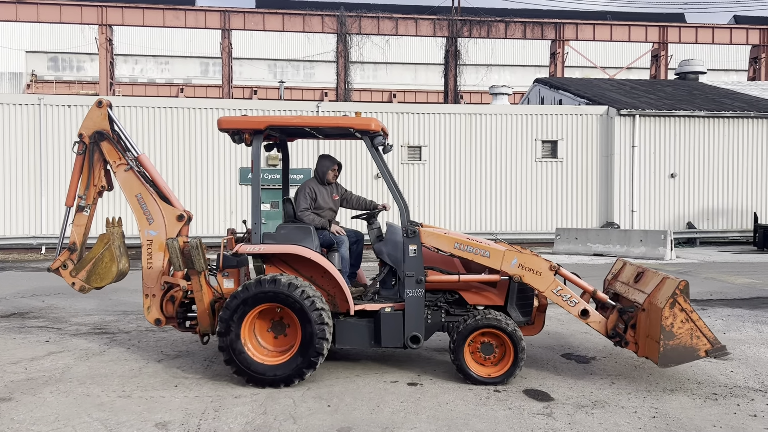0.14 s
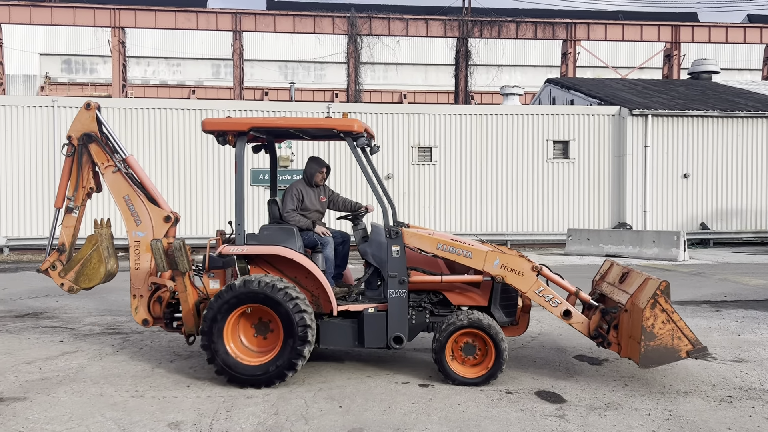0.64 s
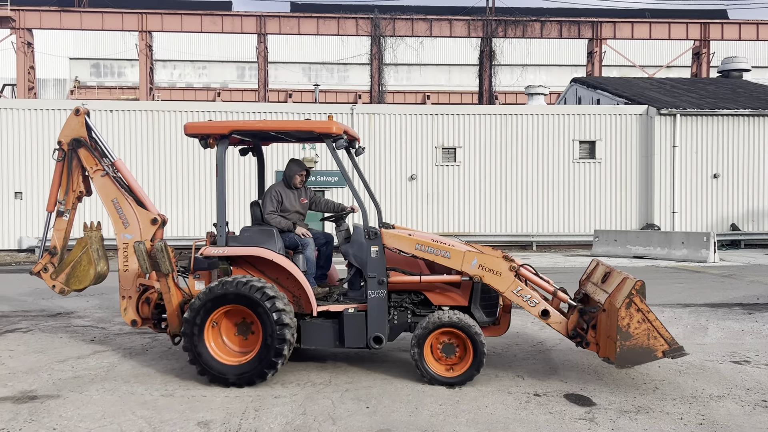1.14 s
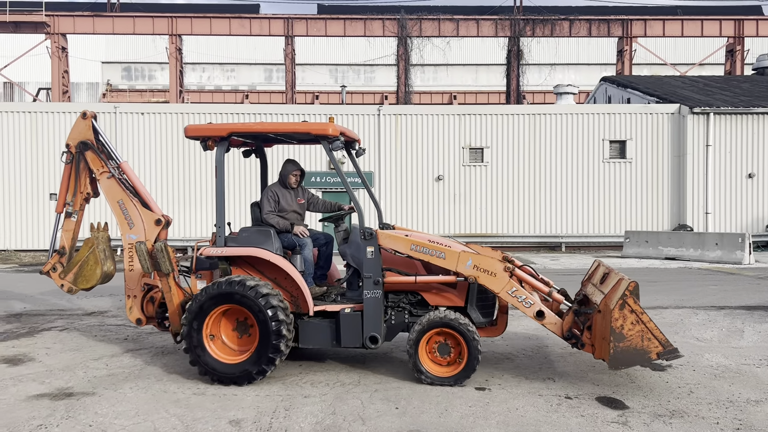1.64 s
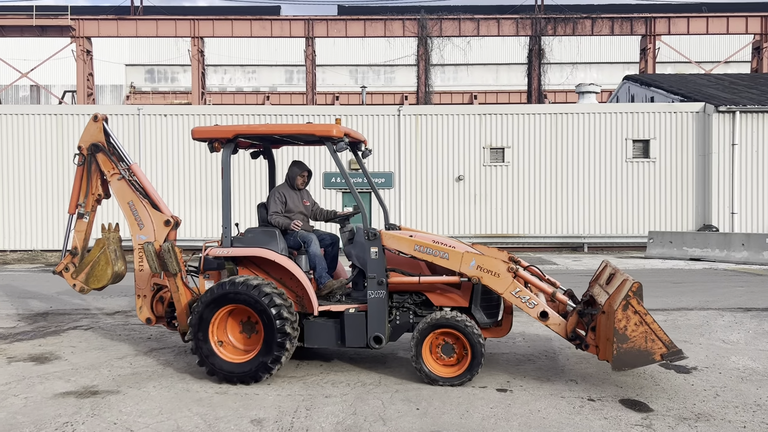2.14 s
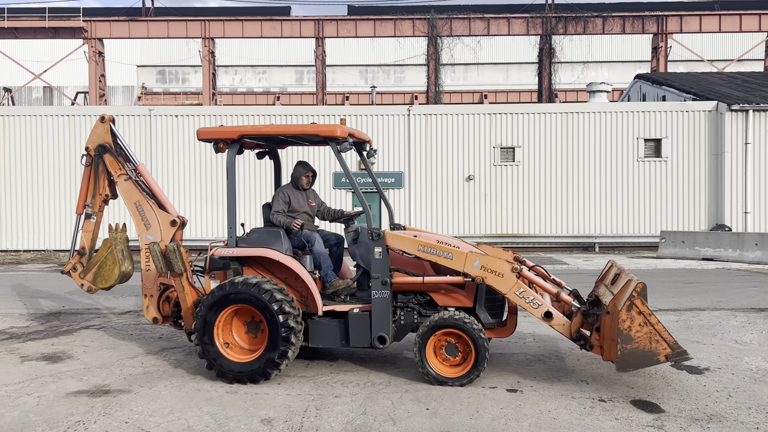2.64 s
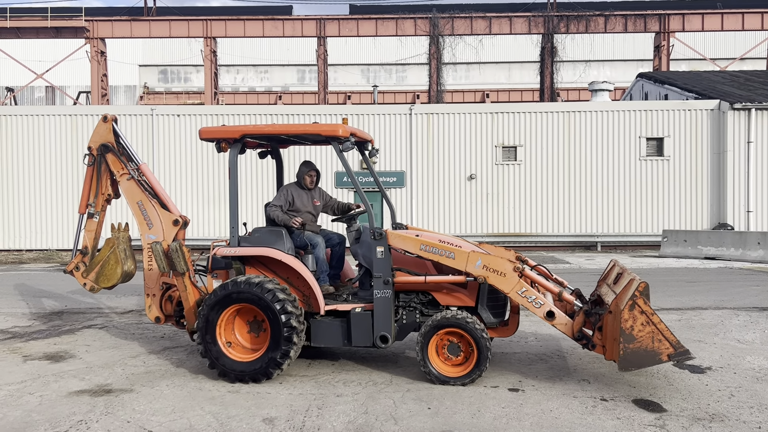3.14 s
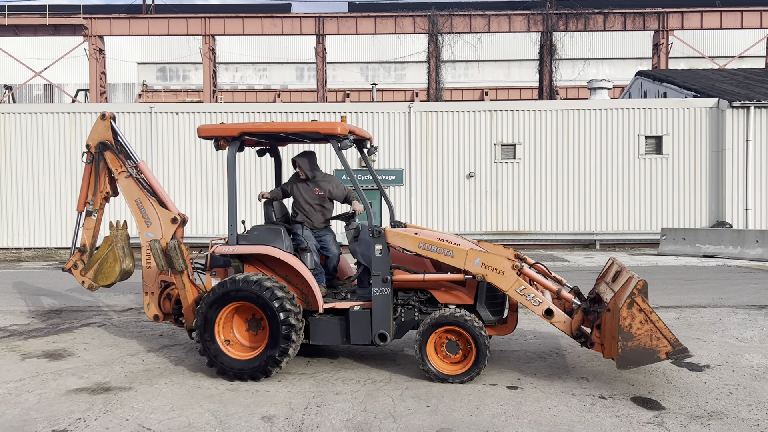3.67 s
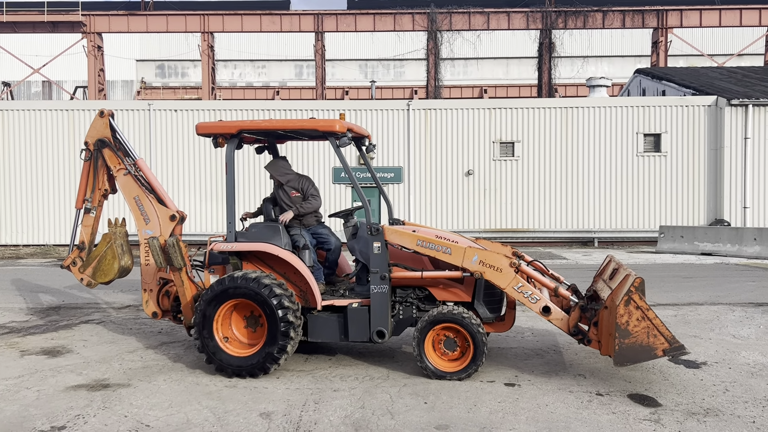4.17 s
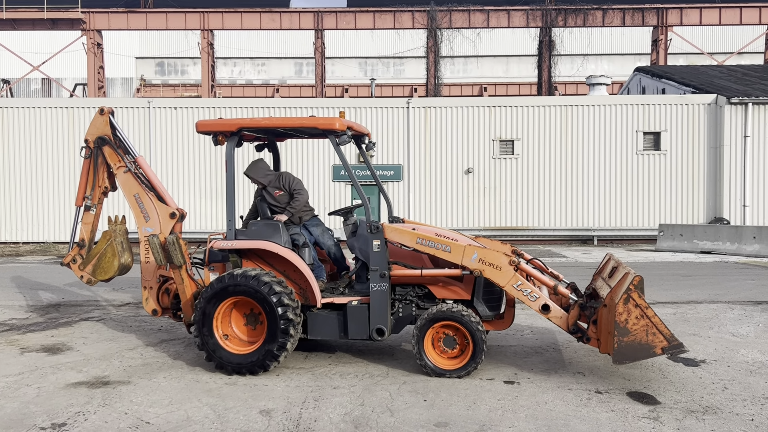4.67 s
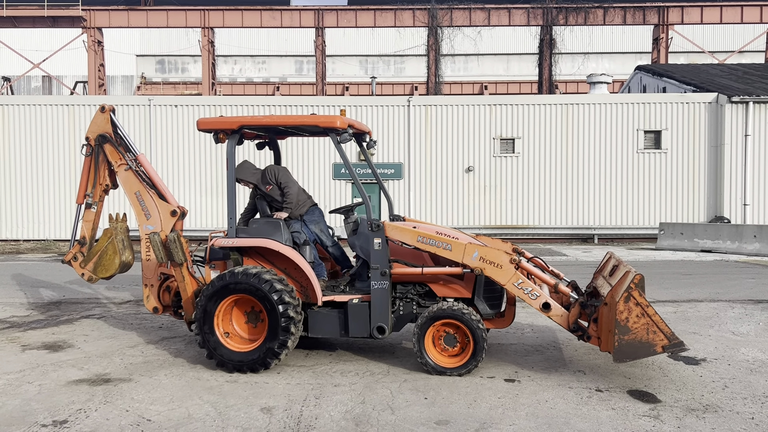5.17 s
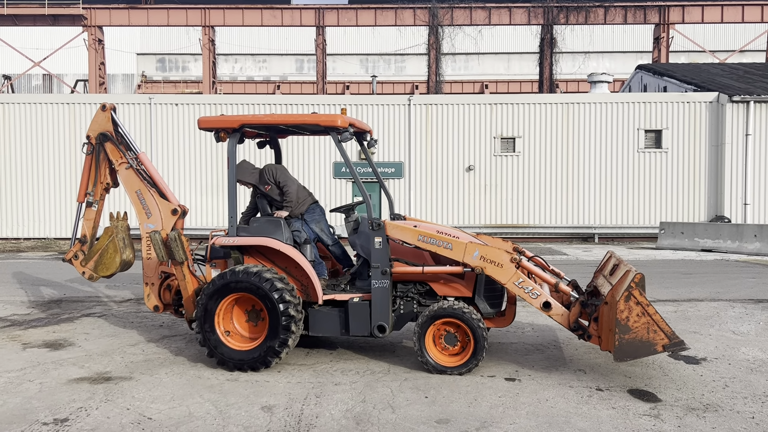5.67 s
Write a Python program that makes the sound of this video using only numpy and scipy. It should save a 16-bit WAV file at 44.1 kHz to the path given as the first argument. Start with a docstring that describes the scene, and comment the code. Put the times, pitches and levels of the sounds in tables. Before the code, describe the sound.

Close, steady diesel engine chug with knocking and hissy rattle; its pitch dips at the start and end, with loose metal clanking.

```python
"""Diesel loader at idle

A four-cylinder diesel loader idles on open tarmac, heard through two close microphone ports.
Its speed sags twice under hydraulic load: a pump whines in the first sag, overtones of the firing stand
out in both. Exhaust orders and pumped noise carry the low note; combustion knock, gear lines, clatter noise
and injector spray the upper rattle. Loose steel parts clank, a tappet rattles and one dry snap is heard.
"""
import sys
import numpy as np
from scipy import signal
from scipy.fft import rfft, irfft
from scipy.io import wavfile
from scipy.ndimage import uniform_filter1d

SR = 44100
rng = np.random.default_rng(int(sys.argv[2]) if len(sys.argv) > 2 else 0)


def generate_wav(sig):
    """Save sig (samples, or channels by samples) to the path in sys.argv[1] as 16-bit PCM at SR."""
    pcm = np.round(np.clip(np.atleast_2d(sig).T, -1, 1) * 32767).astype(np.int16)
    wavfile.write(sys.argv[1], SR, pcm)


def magnitude_from_level(level_db):
    """Linear magnitude for a level in decibels (20 dB per decade)."""
    exponent = np.asarray(level_db, float) / 20
    return 10 ** exponent


N = 255780  # samples

FIRING_AT = .11  # share of the cycle at which the first cylinder knocks
RISE_S = 0.0016  # onset of every steel blow
# Ringing modes of steel parts: (frequency before detuning [Hz], relative level [dB], t60 [s])
STEEL_MODES = [(1398, 4, 0.035), (1572, -4.5, 0.042), (2025, 2, 0.058), (2186, 0, 0.044), (2850, 5, 0.042),
               (3133, 4, 0.043), (4010, 1.5, 0.024), (4800, -3.5, 0.046)]


def evened(x):
    """Scales a signal to rms 1."""
    return x / np.sqrt(np.mean(x ** 2) + 1e-20)


def read(points, hz):
    """Reads a curve by straight lines over log frequency."""
    f, value = np.transpose(points)
    return np.interp(np.log(hz + 1), np.log(f + 1), value)


def follow(rows):
    """Every column of a table, joined by straight lines over all samples."""
    s, *columns = np.transpose(rows)
    return [np.interp(np.arange(N) / SR, s, c) for c in columns]


def drift(hz):
    """Slow chance of rms 1, with hz fresh values a second."""
    steps = round(N / SR * hz) + 2
    values = rng.standard_normal(steps)
    return evened(np.interp(np.linspace(0, steps - 1, N), np.arange(steps), values))


def spread(direct, scattered, spectrum, db):
    """Colours a noise and adds scattered sound of opposite sign at the two ports."""
    # Likeness of the two ports: (frequency [Hz], correlation [0-1])
    likeness = [(60, .98), (300, .99), (800, .82), (1400, .82), (2400, .8), (3000, .87), (5500, .6),
                (6500, .95), (8000, .8), (9600, 1), (10800, 1), (11700, .7), (13200, 1), (15000, .7)]
    hz = np.fft.rfftfreq(N, 1 / SR)
    same = np.clip(read(likeness, hz), 0, 1)
    mid = np.sqrt(1 + same) * rfft(direct)
    side = np.sqrt(1 - same) * rfft(scattered)
    colour = magnitude_from_level(read(spectrum, hz))
    return magnitude_from_level(db) * evened(irfft(colour * np.array([mid + side, mid - side]), N))


def knock_gate(cycle, decay, rise):
    """A burst at every firing, sized by cylinder and chance; decay and rise in firing intervals."""
    # Knock strength of each cylinder in turn: (level [dB])
    cylinder_db = [-2, -0.9, -3.3, -3]
    firing = 4 * (cycle - FIRING_AT) + 4  # the added cycle keeps the count positive
    count, part = firing.astype(int), firing % 1
    chance_db = 1.6 * rng.standard_normal(count.max() + 1)
    size_db = np.array(cylinder_db)[count % 4] + chance_db[count]
    return magnitude_from_level(size_db) * np.exp(-part / decay) * (1 - np.exp(-part / rise))


def ring(modes, t, near_hz):
    """One blow on a set of modes, detuned by chance; modes near the given pitch ring loudest."""
    out = 0
    for hz, db, t60 in modes:
        off_pitch_db = 4.6 * np.log2(hz / near_hz) ** 2
        level_db = db + 2.5 * rng.standard_normal() - off_pitch_db - 60 * t / t60
        phase = 2 * np.pi * hz * rng.uniform(.94, 1.06) * t + 2 * np.pi * rng.random()
        out = out + magnitude_from_level(level_db) * np.sin(phase)
    return out


def tone(hz, db):
    """A sine line, slightly unsteady in level and phase."""
    phase = 2 * np.pi * np.cumsum(hz) / SR + .2 * drift(30)
    return np.sqrt(2) * magnitude_from_level(db + drift(25)) * np.sin(phase)


def swells(rows, pulse_hz):
    """Multiples of a pulse rate that fade in, hold and fade out."""
    edge_s = .06
    t, out = np.arange(N) / SR, np.zeros(N)
    for s, length, multiple, db in rows:
        shape = np.clip(np.minimum(t - s, s + length - t) / edge_s, 0, 1)
        out += np.sin(np.pi / 2 * shape) ** 2 * tone(round(multiple) * pulse_hz, db)
    return out


def snap():
    """One dry snap: a few milliseconds of band-limited noise with no ring."""
    start_s, peak_db = 3.995, -27
    out, t = np.zeros(N), np.arange(SR // 100) / SR
    out[round(start_s * SR):][:len(t)] = rng.standard_normal(len(t)) * magnitude_from_level(-60 * t / .012)
    band = signal.butter(2, [2500, 5600], "bandpass", fs=SR, output="sos")
    crack = signal.sosfilt(band, out)
    return magnitude_from_level(peak_db) * crack / abs(crack).max()


def pump_whine(rate):
    """Hydraulic whine on multiples of the pump's pulse, which is locked to the crank."""
    # Whine swells: (start [s], length [s], multiple of the pump pulse, level [dB])
    whine_rows = [(.12, .36, 2, -44), (.15, .36, 3, -41), (.55, .33, 3, -45), (.3, .2, 4, -47),
                  (.54, .37, 4, -43)]
    pulses_per_cycle = 39
    return swells(whine_rows, pulses_per_cycle * rate / 4)


def firing_overtones(rate):
    """Overtones of the firing note that stand out while the engine labours."""
    # Overtone swells: (start [s], length [s], multiple of the firing rate, level [dB])
    overtone_rows = [(0, .15, 10, -42), (.22, .25, 18, -44), (.32, .2, 16, -41), (.44, .2, 14, -39.5),
                     (.64, .18, 11, -38.5), (.71, .17, 13, -40.5), (.8, .42, 16, -44), (.82, .35, 17, -44),
                     (1.0, .13, 10, -43), (1.11, .13, 12, -43), (5.07, .1, 10, -36), (5.13, .18, 28, -40),
                     (5.12, .15, 21, -42), (5.26, .29, 21, -41), (5.51, .35, 21, -39), (5.3, .55, 17, -41),
                     (5.31, .11, 12, -38), (5.56, .1, 11, -39)]
    return swells(overtone_rows, rate)


def clanks(cycle):
    """Loose steel parts knocking together: a crack, a bounce and a short ring."""
    # Single clanks: (time [s], peak level [dB], favoured pitch [Hz])
    clank_rows = [(0.0827, -26, 1290), (0.2284, -25.5, 1590), (0.6934, -25, 1490), (1.1618, -28, 1460),
                  (1.578, -23.5, 1630), (2.747, -29, 1450), (3.4884, -29.5, 1230), (3.9964, -30, 1390),
                  (4.0792, -27, 1460), (4.527, -25.5, 1460)]
    # Treble modes of the crack: (frequency before detuning [Hz], relative level [dB], t60 [s])
    treble_modes = [(7100, 11, 0.0097), (8020, -5, 0.027), (8550, 1, 0.021), (12500, -6, 0.018),
                    (13900, -9.5, 0.023)]
    clank_treble_db = -22
    # under the deep sag one part clanks once a cycle, louder and brighter as the load holds
    first_s = 5.275
    labour_db, labour_db_per_s = -28.5, 10
    labour_hz, labour_hz_per_s = 1400, 1200
    labour_treble_db, labour_treble_db_per_s = -12.5, 19

    turns = cycle - cycle[round(first_s * SR)]
    late = np.interp(np.arange(int(turns[-1]) + 1), turns, np.arange(N) / SR) - first_s
    rows = [(*row, clank_treble_db) for row in clank_rows]
    for s in late:
        rows.append((first_s + s, labour_db + labour_db_per_s * s, labour_hz + labour_hz_per_s * s,
                     labour_treble_db + labour_treble_db_per_s * s))

    out, t = np.zeros(N + SR), np.arange(SR // 10) / SR
    bounce = round(.009 * SR)
    for s, db, hz, treble_db in rows:
        blow = ring(STEEL_MODES, t, hz) + magnitude_from_level(treble_db) * ring(treble_modes, t, 11000)
        roughness = evened(uniform_filter1d(rng.standard_normal(len(t)), size=60))
        blow *= (1 + .5 * roughness) * (1 - np.exp(-t / RISE_S))
        blow[bounce:] += .5 * blow[:-bounce]
        out[round(s * SR):][:len(t)] += magnitude_from_level(db) * blow / abs(blow).max()
    return out[:N]


def tappet(cycle):
    """One loose tappet rattles twice in quick succession each cycle, on a hollow ring."""
    # Places of the two blows: (share of the cycle)
    blow_places = [.36, .5]
    # Hollow ring: (frequency [Hz])
    ring_hz = [1394, 1538]
    # Strength of the blows: (time [s], relative level [dB])
    strength = [(0, -40), (1.2, -36), (1.8, -30), (2.6, -32.5), (3.4, -37), (4.5, -32), (5.2, -46),
                (5.8, -32)]
    t = np.arange(SR // 20) / SR
    blow = sum(np.sin(2 * np.pi * hz * t) for hz in ring_hz)
    blow = blow * magnitude_from_level(-60 * t / 0.034) * (1 - np.exp(-t / 0.00073))
    beats = sum(np.diff(np.floor(cycle - place)) > 0 for place in blow_places)
    size = magnitude_from_level(follow(strength)[0][1:] + 1.4 * rng.standard_normal(N - 1))
    return signal.oaconvolve(beats * size, blow)[:N]


def gears(cycle):
    """Thin lines of timing gears and valve train, locked to the crank."""
    # Gear lines: (multiple of the cycle)
    gear_orders = [49, 52, 55, 60, 68, 73, 80, 84, 92, 94, 100, 107, 111, 117, 132, 143, 150, 152, 159, 160,
                   169, 194, 204, 205, 234, 240]
    # Their strengths in the same order: (relative level [dB])
    gear_db = [-58, -62.5, -51.5, -50.5, -57, -52.5, -54, -61, -60, -60, -57, -49.5, -57, -54, -57, -56.5,
               -63, -56, -59.5, -60, -59, -56.5, -58.5, -70, -65, -68.5]
    out = np.zeros(N)
    for order, db in zip(gear_orders, gear_db):
        phase = 2 * np.pi * (order * cycle + rng.random()) + 0.57 * drift(6)
        out += np.sqrt(2) * magnitude_from_level(db + 1.1 * drift(4)) * np.sin(phase)
    return out


def hiss(cycle):
    """Noise of the upper middle that swells with each firing."""
    # Colour of the hiss: (frequency [Hz], relative level [dB])
    hiss_colour = [(1500, -3.5), (2900, 11), (4200, 2.5), (5600, -9.5), (7500, -29.5), (9000, -49)]
    swell = (0.17 + knock_gate(cycle, 1.0, 0.069)) * magnitude_from_level(.5 * drift(9))
    return spread(*(rng.standard_normal((2, N)) * swell), hiss_colour, -47)


def roar(cycle):
    """Block, fan and panels: clatter noise that repeats each cycle, and fresh noise lightly pumped by firings."""
    # Colour of the roar: (frequency [Hz], relative level [dB])
    roar_colour = [(200, -20), (330, 2.5), (430, -1.5), (560, 0), (800, -2), (1200, -7.5), (1470, -7),
                   (1680, -3.5), (1820, -11.5), (2070, -8), (2480, -14.5), (2800, -12.5), (4500, -20.5),
                   (6000, -42.5)]
    # Part of the direct noise that repeats each cycle: (frequency [Hz], share of power [0-1])
    repeat_share = [(300, 0.04), (500, 0.3), (1000, 0.09), (2000, 0.04), (3000, 0.04)]
    pattern = rng.standard_normal(3200)  # one cycle of valve and piston clatter
    places = np.arange(len(pattern)) / len(pattern)
    repeated = evened(np.interp(cycle % 1, places, pattern, period=1))
    pumping = evened(1 + 1.6 * knock_gate(cycle, 1.0, 0.053)) * magnitude_from_level(0.45 * drift(12))
    fresh = rng.standard_normal((2, N)) * pumping
    share = np.clip(read(repeat_share, np.fft.rfftfreq(N, 1 / SR)), 0, 1)
    direct = irfft(np.sqrt(share) * rfft(repeated) + np.sqrt(1 - share) * rfft(fresh[0]), N)
    return spread(direct, fresh[1], roar_colour, -34.5)


def injectors(cycle):
    """Injector spray: treble noise that jumps at each injection and sags until the next."""
    # Colour of the spray: (frequency [Hz], relative level [dB])
    spray_colour = [(3500, -20), (5500, -1), (7200, 2.5), (9000, 3), (10200, 6), (11500, -14), (14000, -16),
                    (16000, -9.5)]
    noise = rng.standard_normal((2, N)) * (.3 + knock_gate(cycle, .6, .06))
    return spread(*noise, spray_colour, -51)


def knocks(cycle):
    """Combustion and tappet blows of uneven size, eight a cycle, ring the steel of the block."""
    # Hollow modes of the block: (frequency before detuning [Hz], relative level [dB], t60 [s])
    block_modes = [(510, 5, .06), (585, -8, 0.017), (710, 0, 0.04), (943, 2.5, 0.081)]
    variants = 12  # differently pitched blows, picked by chance
    beats = np.diff(np.floor(8 * (cycle - FIRING_AT))) > 0
    size = magnitude_from_level(3 * np.clip(rng.standard_normal(N - 1), -2, 1.5)) * beats
    variant = rng.integers(0, variants, N - 1)
    t, out = np.arange(SR // 20) / SR, np.zeros(N)
    for k in range(variants):
        blow = ring(STEEL_MODES, t, 600 * 1.156 ** k) + 0.47 * ring(block_modes, t, 600 * 1.127 ** k)
        out += signal.oaconvolve(size * (variant == k), blow * (1 - np.exp(-t / RISE_S)))[:N]
    return magnitude_from_level(-44.5) * evened(out)


def rumble(cycle):
    """Low exhaust noise that each firing lifts."""
    # Colour of the rumble: (frequency [Hz], relative level [dB])
    rumble_colour = [(25, -20), (45, 11), (75, 5), (130, 17), (190, 17), (260, 16), (340, -32)]
    puffs = rng.standard_normal((2, N)) * (1 + 0.59 * knock_gate(cycle, 0.64, 0.07))
    return spread(*puffs, rumble_colour, -24)


def exhaust(cycle, load):
    """Orders of the cycle; those between firing multiples come from one uneven cylinder and waver more."""
    first_order = 3
    # Successive multiples of the four-stroke cycle: (idle level [dB], loaded level [dB])
    orders_db = [(-47, -54), (-17, -19.5), (-39, -35.5), (-64, -36.5), (-34, -31.5), (-21.5, -20.5),
                 (-35.5, -39), (-30, -49), (-50.5, -24.5), (-22.5, -19), (-26, -43), (-27.5, -31.5),
                 (-38.5, -24), (-23, -21), (-34, -42.5), (-33, -44), (-38.5, -25), (-52, -27),
                 (-41.5, -42.5), (-40.5, -60), (-48, -58), (-41, -41.5), (-64.5, -46.5), (-57, -41),
                 (-58.5, -74), (-64.5, -53), (-68.5, -64), (-51, -67), (-54, -77), (-80.5, -55), (-66, -63),
                 (-55, -60), (-60, -61), (-50, -52.5), (-55, -55), (-54, -61), (-65.5, -59), (-50.5, -46.5),
                 (-53, -50), (-68.5, -51.5), (-52, -49.5), (-44.5, -71)]
    # Pulse of all four firings: (share of the cycle, lag per order squared [rad], offset [rad])
    even_pulse = (.145, -.011, -.45)
    # Pulse of the uneven cylinder: (share of the cycle, lag per order squared [rad], offset [rad])
    uneven_pulse = (.25, .053, -1.62)
    out = np.zeros(N)
    for order, (idle_db, load_db) in enumerate(orders_db, first_order):
        even = order % 4 == 0
        place, lag, offset = even_pulse if even else uneven_pulse
        waver = (.03 if even else .09) * np.sqrt(order / 4)  # phase in rad; it scales the level drift too
        phase = 2 * np.pi * order * (cycle - place) - lag * order ** 2 + offset
        phase = phase + waver * drift(12.0)
        level_db = idle_db + (load_db - idle_db) * load + 5 * waver * drift(7)
        out += np.sqrt(2) * magnitude_from_level(level_db) * np.cos(phase)
    return out


def pipe_boom(note):
    """A pipe resonance in the low note that swells now and then; returns what the swells add."""
    # Swells of the pipe: (centre time [s], boost [dB])
    boom_swells = [(.04, 6), (.24, 6)]
    pipe_hz, width_hz, half_length_s = 163, 14, .065
    t = np.arange(N) / SR
    boom_db = sum(db * np.exp(-.5 * ((t - s) / half_length_s) ** 2) for s, db in boom_swells)
    boom = signal.lfilter(*signal.iirpeak(pipe_hz, pipe_hz / width_hz, SR), note)
    return (magnitude_from_level(boom_db) - 1) * boom


def scene():
    """One speed curve drives every engine layer; its sag from idle sets the load."""
    # Engine speed: (time [s], firing rate [Hz])
    speed = [(0.0, 55.42), (0.231, 53.8), (0.567, 50.94), (0.714, 50.31), (0.839, 50.46), (0.96, 50.97),
             (1.257, 53.0), (1.427, 53.53), (2.04, 53.8), (3.467, 54.0), (4.502, 53.9), (5.054, 54.05),
             (5.157, 53.28), (5.36, 49.53), (5.452, 48.42), (5.563, 47.97), (5.8, 48.09)]
    # Balance of the engine: (time [s], exhaust level [dB], rattle level [dB])
    balance = [(0, 1, 4), (.12, -2, 1.5), (.3, -0.5, 2), (1, 0, 0), (2, -1.5, .5), (3.6, -2, 0),
               (4.4, -.5, 0), (5.3, -2, 0), (5.8, -2.5, 0.5)]
    idle_rate, loaded_rate = 53.6, 49.5  # firings per second
    rate, = follow(speed)
    cycle = np.cumsum(rate) / SR / 4  # four firings make a cycle
    load = np.clip((idle_rate - rate) / (idle_rate - loaded_rate), 0, 1)
    exhaust_db, rattle_db = follow(balance)

    note = exhaust(cycle, load) + rumble(cycle)
    low = magnitude_from_level(exhaust_db) * (note + pipe_boom(note))
    rattle = roar(cycle) + hiss(cycle) + knocks(cycle) + tappet(cycle)
    rattle = rattle + magnitude_from_level(-5 * load) * gears(cycle)
    # more fuel under load; the spray also shares part of the rattle's level
    spray = magnitude_from_level(2.5 * load + .6 * rattle_db) * injectors(cycle)
    lines = pump_whine(rate) + firing_overtones(rate)
    return low + magnitude_from_level(rattle_db) * rattle + spray + lines + clanks(cycle) + snap()


def low_pass(x):
    """Removes everything above the highest recorded frequency."""
    return signal.sosfilt(signal.butter(12, 15730, fs=SR, output="sos"), x)


def record(dry):
    """Two close microphone ports differ in level and phase."""
    # Level difference of the ports: (frequency [Hz], left minus right [dB])
    port_tilt = [(60, .9), (200, .7), (380, -.4), (700, -3), (1290, .4), (2380, -1.5), (4400, -2),
                 (6500, 0), (15000, 0)]
    # Phase difference of the ports: (frequency [Hz], lead of the left [rad])
    port_lead = [(0, 0), (60, .22), (130, .26), (170, -.28), (340, -.3), (860, .53), (1380, -.31),
                 (2400, .64), (4990, 1.41), (6030, -.3), (7600, -.43), (9600, -3.14), (10900, -3.14),
                 (12600, -6.28), (14300, -6.35), (15800, -8.8)]
    hz = np.fft.rfftfreq(N, 1 / SR)
    half = magnitude_from_level(read(port_tilt, hz) / 2) * np.exp(.5j * read(port_lead, hz))
    mix = irfft(rfft(dry) * np.array([half, 1 / half]), N)
    return low_pass(mix)


dry = scene()
out = record(dry)
generate_wav(out)
```